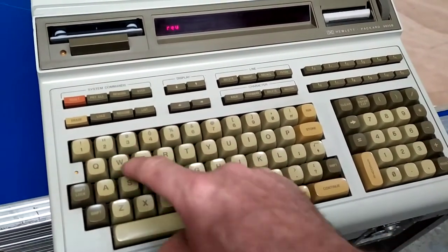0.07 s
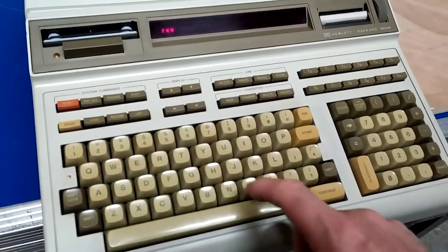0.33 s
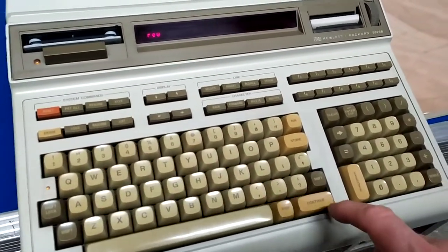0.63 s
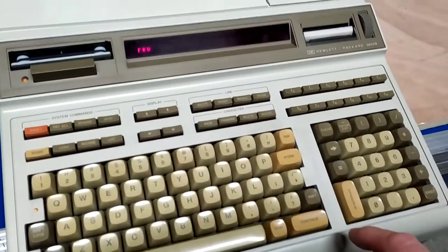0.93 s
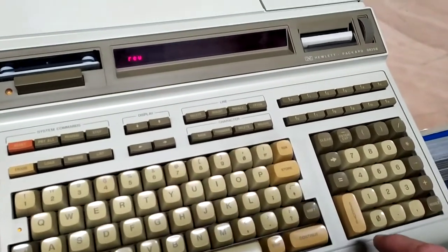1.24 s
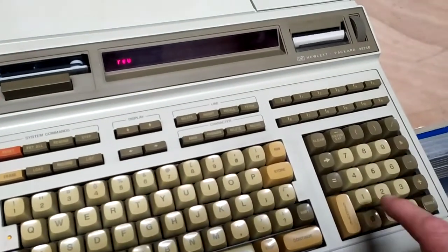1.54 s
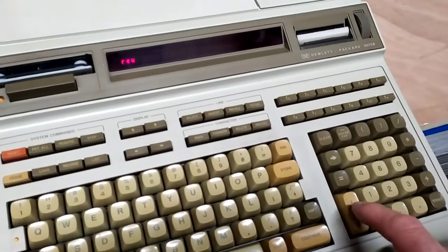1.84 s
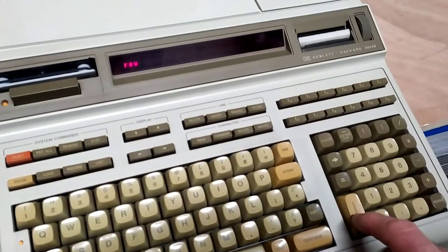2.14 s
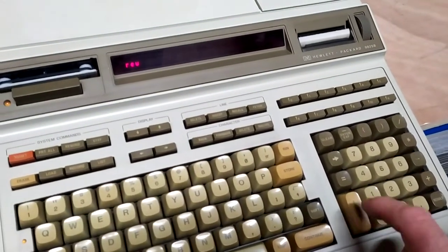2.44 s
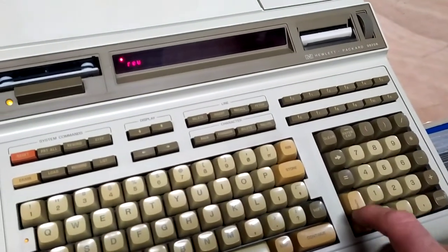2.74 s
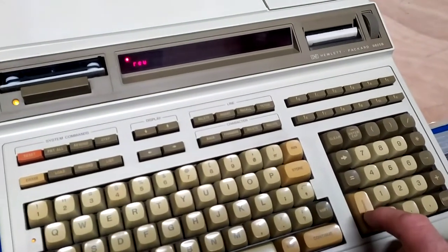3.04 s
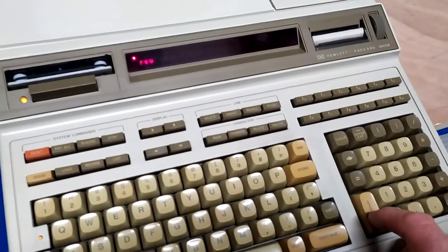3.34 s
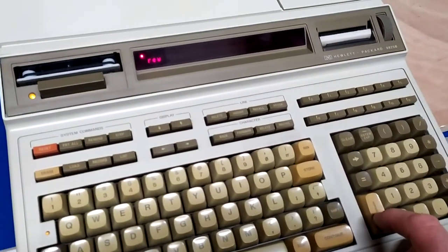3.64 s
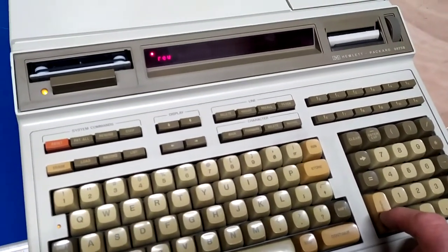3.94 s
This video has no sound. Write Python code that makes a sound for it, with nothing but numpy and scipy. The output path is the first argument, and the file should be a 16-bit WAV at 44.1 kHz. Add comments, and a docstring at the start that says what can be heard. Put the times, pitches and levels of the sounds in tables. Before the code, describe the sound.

A desktop computer's tape drive whines and rattles in three quick runs, set off by a sharp key clack. Before that, its fan hums quietly after a few faint key taps, close by in a small room.

```python
"""A small room, a hand-held microphone close to a desktop computer. Its fan hums, keys are struck,
and the tape cartridge drive shuttles forward, back and forward. The capstan whines on the multiples
of its turning rate, the cartridge buzzes and rattles once a turn, the mechanism clunks at each start,
and loose plastic crackles and ticks, most of all on the backward run."""
import sys
import numpy as np
from scipy import signal
from scipy.fft import rfft, irfft
from scipy.io import wavfile
from scipy.ndimage import uniform_filter1d, map_coordinates

SR = 44100
rng = np.random.default_rng(int(sys.argv[2]) if len(sys.argv) > 2 else 0)


def unload_audio(sound):
    """Save the sound as a 16-bit wav file, at the path given as the first command line argument."""
    columns = np.transpose(np.atleast_2d(sound))
    # keep every value between -1 and 1, then stretch to whole-number steps
    steps = np.round(np.clip(columns, -1, 1) * 32767)
    wavfile.write(sys.argv[1], SR, steps.astype(np.int16))


N = 176400
TIME = np.arange(N) / SR

# stereo likeness of the machine's noises (frequency [Hz], left-right correlation [-1..1])
MACHINE_LIKENESS = [(200, 1), (700, 0.44), (1500, 0.5), (3000, 0.12), (12000, 0)]
# ring of loose plastic (frequency [Hz], relative density [dB])
PLASTIC_SPECTRUM = [(1000, -29), (3000, -10.5), (5200, -4), (6200, -3.5), (8000, -4), (9200, 6),
                    (11000, -4), (13300, -7), (14500, -40), (16000, -21)]


def undb(db):
    """Decibels to gain."""
    return 10 ** (np.asarray(db) / 20)


def unit(x):
    """Scale to rms 1."""
    return x / np.sqrt(np.mean(x ** 2))


def pan(db):
    """Left and right gains for a level difference, left minus right."""
    return undb(np.array([db, -db]).reshape(2, -1) / 2)


def curve(points):
    """A table over frequency, read at every bin."""
    hz, value = np.array(points, float).T
    return np.interp(np.log(np.arange(N // 2 + 1) * SR / N + 1), np.log(hz), value)


def colour(x, spectrum):
    """Causal filter with the given spectrum and unit power gain."""
    cepstrum = irfft(np.log(unit(undb(curve(spectrum)))), N)
    cepstrum[1:N // 2] *= 2
    cepstrum[N // 2 + 1:] = 0
    response = irfft(np.exp(rfft(cepstrum)), N)[:N // 20]
    return signal.fftconvolve(x, response[None], axes=1)[:, :N]


def resonate(x, hz, width_hz):
    """A steep resonance at rms 1."""
    b, a = signal.iirpeak(hz, hz / width_hz, fs=SR)
    return unit(signal.lfilter(b, a, signal.lfilter(b, a, x)))


def noise(likeness=MACHINE_LIKENESS):
    """Stereo white noise with a given correlation in each band."""
    correlation = np.clip(curve(likeness), -.99, .99)
    mid, side = rfft(rng.standard_normal((2, N))) * np.sqrt([1 + correlation, 1 - correlation])
    return unit(irfft([mid + side, mid - side], N))


def walk(per_s):
    """Smooth random drift at rms 1."""
    knots = rng.standard_normal(N // 10)
    drift = np.interp(TIME * per_s, np.arange(len(knots)), knots)
    return unit(uniform_filter1d(drift, int(SR / per_s / 2) + 1))


def ring(at, hz, decay_s):
    """One mode that swells briefly and dies."""
    age = np.maximum(TIME - at, 0)
    return age / decay_s * np.exp(1 - age / decay_s) * np.sin(2 * np.pi * hz * age)


def blows(hits):
    """One impulse for each (time [s], level [dB])."""
    out = np.zeros(N)
    for at, db in hits:
        out[int(at * SR)] += undb(db)
    return out


def struck(hits, spectrum, ring_s, room_s, room_db):
    """The dense ring of a part after each blow, then the room."""
    energy = blows(hits) ** 2 + 1e-18
    fade = lambda s: np.sqrt(signal.lfilter([2 / s / SR], [1, -np.exp(-2 / s / SR)], energy))
    envelope = np.hypot(fade(ring_s), undb(room_db) * fade(room_s))
    return colour(noise() * envelope, spectrum)


def echoes(x, decay_s):
    """Dense reflections that die away, different on each side of the microphone."""
    age = TIME[:N // 10]
    response = rng.standard_normal((2, len(age))) * np.exp(-age / decay_s)
    response /= np.sqrt(np.sum(response ** 2, axis=1, keepdims=True))
    return signal.fftconvolve(np.atleast_2d(x), response, axes=1)[:, :N]


def once_a_turn(turns, width, base, scatter_db, slip=.047):
    """A swell in every turn, each with its own strength and angle; width and slip are in turns."""
    size, shift = rng.standard_normal((N // 500, 2)).T
    turn = turns.astype(int)
    off_peak = turns % 1 - .5 - slip * shift[turn]
    return unit(base + undb(scatter_db * size[turn]) * np.exp(-.5 * (off_peak / width) ** 2))


def fan():
    """Wavering fan and mains tones over a steady rush of air."""
    hum = [(48.4, -74), (183.0, -65.5), (317.6, -59), (629.8, -72), (947.5, -67.5), (1265, -78),
           (1577, -76.5), (1895, -82), (1986, -73.5)]  # fan and mains tones (frequency [Hz], level [dB])
    air_spectrum = [(20, -61), (36, -27), (50, -10), (70, -12.5), (122, -14.5), (178, -9), (253, -16),
                    (313, -6), (469, -17.5), (900, -15), (1140, -18), (1950, -19), (3000, -26.5),
                    (6000, -30), (12000, -33.5), (15000, -31)]  # rush of air (frequency [Hz], relative density [dB])
    air_likeness = [(100, 0.84), (500, 0.77), (1500, 0.69), (5000, 0.068)]  # its stereo likeness (frequency [Hz], correlation [-1..1])
    tones = 0
    for hz, db in hum:
        amplitude = np.sqrt(2) * undb(db + 1.1 * walk(11))
        cycles = np.cumsum(hz * (1 + .00214 * walk(12))) / SR
        tones += amplitude * np.sin(2 * np.pi * cycles)
    air = colour(noise(air_likeness), air_spectrum) * undb(-60.5 + .06 * walk(2.65))
    return undb(.5) * tones * pan(-.5) + air


def keystrokes():
    """A key lands with a short clack; the case answers, the keycap rings and its spring sizzles."""
    strokes = [(.001, -21, -11, 0), (.008, -22, -22, -10), (.076, -38, -27, -6), (2.652, 0, -1.5, -4)]  # key strokes (time [s], clack [dB], case [dB], keycap and spring [dB])
    case_spectrum = [(40, -36), (100, -3), (200, -7), (440, -13.5), (800, -1), (1500, 5.5), (2400, 1.5),
                     (4000, -14), (8000, -17.5), (12000, -20), (15000, -21)]  # ring of the case (frequency [Hz], relative density [dB])
    spring_spectrum = [(1500, -20), (3000, -1), (5500, -2), (7500, -18), (9300, 3), (15000, -31)]  # sizzle of the spring (frequency [Hz], relative density [dB])
    clack_modes = [(1350, .0006, -19.5), (2150, .0006, -18.5)]  # key hitting its stop (frequency [Hz], decay [s], level [dB])
    keycap_modes = [(641, .009, -51), (1550, .005, -52), (2260, .012, -56), (2848, .006, -59)]  # keycap ringing on (frequency [Hz], decay [s], level [dB])
    case_hits = [(at, db) for at, _, db, _ in strokes]
    spring_hits = [(at, db) for at, _, _, db in strokes]
    out = undb(-5.5) * struck(case_hits, case_spectrum, ring_s=.0085, room_s=.023, room_db=0)
    out += undb(-28.5) * struck(spring_hits, spring_spectrum, ring_s=.0099, room_s=.048, room_db=-2)
    for at, clack_db, _, keycap_db in strokes:
        out += sum(undb(clack_db + db) * ring(at, hz, decay_s) for hz, decay_s, db in clack_modes)
        out += sum(undb(keycap_db + db) * ring(at, hz, decay_s) for hz, decay_s, db in keycap_modes)
    return out * pan(-3)


def plastic_ticks():
    """Loose plastic snaps for a few cycles and rings briefly, right of centre."""
    ticks = [(.077, -48), (.097, -44), (3.157, -22), (3.1845, -12), (3.189, -20), (3.2075, -19),
             (3.2215, -16), (3.2538, -13.5), (3.288, -21), (3.334, -15.5), (3.338, -21), (3.346, -20),
             (3.3683, -8), (3.372, -20), (3.448, -19), (3.4826, -8.5), (3.487, -19), (3.517, -19)]  # snaps of the plastic (time [s], level [dB])
    snap_band = signal.butter(4, (8400, 13300), "bandpass", fs=SR, output="sos")
    snap = signal.sosfilt(snap_band, blows(ticks) + 1e-18)
    tail = struck(ticks, PLASTIC_SPECTRUM, ring_s=.0014, room_s=.012, room_db=-2)
    return (undb(13) * snap + undb(5) * tail) * pan(-4)


def chassis_thuds():
    """The chassis thuds as the last key lands and the motor starts."""
    thuds = [(2.655, 101, 0.01, -51.5), (2.73, 313.4, 0.025, -39)]  # chassis modes (time [s], frequency [Hz], decay [s], level [dB])
    return sum(undb(db) * ring(at, hz, decay_s) for at, hz, decay_s, db in thuds)


def capstan_whine(turns, harmonics, waver_db=.47):
    """The capstan sings in wavering lines on the multiples of its turning rate."""
    tones = 0
    for multiple, db in harmonics:
        amplitude = undb(db + waver_db * walk(24.71))
        tones += amplitude * np.sin(2 * np.pi * (multiple * turns + rng.random()))
    return np.array([tones, tones])


def cartridge_rattle(turns, repeat_share=.096, clicks_per_s=700):
    """Scraping that partly repeats with each turn, plus loose clicks, scattered inside the case."""
    spectrum = [(1300, -26), (1900, -1), (2350, 0), (2750, 1), (3300, -1.5), (3700, 6.5), (4500, -1),
                (5300, 3), (6400, 1), (7000, 0.5), (7800, -0.5), (9000, -1), (9900, -4.5), (11300, -3.5),
                (13400, -7), (14500, -31)]  # rattling cartridge (frequency [Hz], relative density [dB])
    track = rng.standard_normal(SR // 87)  # roughness met in one turn
    repeating = unit(np.interp(turns % 1 * len(track), np.arange(len(track)), track))
    scrape = np.sqrt(repeat_share) * repeating + np.sqrt(1 - repeat_share) * rng.standard_normal(N)
    clicks = unit((rng.random(N) < clicks_per_s / SR) * rng.standard_normal(N))
    contact = (scrape + undb(-4.5) * clicks) * once_a_turn(turns, width=.15, base=.62, scatter_db=3)
    return colour(.4 * contact + echoes(contact, decay_s=.008), spectrum)


def rasp(turns):
    """A short gritty scrape once a turn."""
    spectrum = [(2000, -29), (4000, 2), (5200, -3), (6700, -8), (7800, -9), (9000, 6), (10000, -6),
                (11300, 5), (13300, -3), (14300, -12), (16000, -55)]  # bright scrape (frequency [Hz], relative density [dB])
    grit = undb(walk(2800)) * noise()
    return colour(grit * once_a_turn(turns, width=.1, base=.05, scatter_db=2.2, slip=.05), spectrum)


def case_reflections(x, sway_per_s=7):
    """Reflections off the case cut notches in the treble that shift as the hand-held microphone moves."""
    paths = [(.000422, .012, -8.5), (.0013, .04, -11), (.0037, .01, -9)]  # bounces off the case (delay [s], drift [share of delay], level [dB])
    out = x
    for delay_s, drift, db in paths:
        position = (TIME - delay_s * (1 + drift * walk(sway_per_s))) * SR
        out = out + undb(db) * np.array([map_coordinates(side, [position], mode="nearest") for side in x])
    return out


def plastic_crackle(turns, clicks_per_s=130):
    """Small irregular ticks of loose plastic, thickest at one point of the turn."""
    chance, size = rng.random(N), rng.standard_normal(N)
    density = once_a_turn(turns, width=.1, base=.15, scatter_db=3)
    clicks = (chance < clicks_per_s / SR * density / np.mean(density)) * size
    return colour(clicks + echoes(clicks, decay_s=.001), PLASTIC_SPECTRUM)


def drive_rumble(turns):
    """A rough midrange noise whose strength changes from turn to turn."""
    spectrum = [(120, -17), (280, -4.5), (600, 0.5), (1100, 5.5), (1400, -6.5), (2200, 7), (2800, -2.5),
                (4500, -18.5)]  # body of the drive (frequency [Hz], relative density [dB])
    return colour(noise() * once_a_turn(turns, width=1, base=.81, scatter_db=5), spectrum)


def shell_buzz(turns):
    """The cartridge shell rings in a regular burst once a turn."""
    bursts = once_a_turn(turns + .1, width=.14, base=.15, scatter_db=1, slip=.04)
    return resonate(noise() * bursts, hz=1584, width_hz=260)


def tape_drive(spin_up_s=.068, brake_s=.075, flutter=.001):
    """The motor strains as it speeds up and brakes; the drive's other noises follow its speed."""
    # runs of the tape (start [s], standstill [s], rate [turns/s], direction [+1 forward, -1 back],
    # whine [dB], rumble and buzz [dB], rattle and rasp [dB], crackle [dB])
    runs = [(2.699, 3.118, 86.6, 1, 3, 1.5, 0.5, -15), (3.123, 3.612, 87.45, -1, 1, 2, 0, -1),
            (3.614, 4.2, 86.5, 1, 1, -0.5, 0.5, -3.5)]
    forward_lines = [(1, -23.5), (2, -20.5), (3, -5), (4, -17), (5, -10), (6, -8), (7, -17.5), (8, -14.5),
                     (9, -17.5), (10, -7), (11, -5), (12, -4.5), (14, -9), (15, -21), (16, -12), (17, 1.5),
                     (18, 0), (19, -10), (20, 2), (21, -6.5)]  # forward whine (multiple [x turning rate], relative level [dB])
    backward_lines = [(1, -21.5), (2, -17.5), (3, -7.5), (4, -17), (5, -12.5), (6, -7.5), (7, -8.5),
                      (8, -8.5), (9, -20.5), (11, -19), (12, -8), (13, -16), (14, -9.5), (15, -12),
                      (16, -11.5), (17, 3), (18, 1.5), (19, -9), (20, -6.5), (21, -8)]  # backward whine (multiple [x turning rate], relative level [dB])
    balance = [(60, 10), (110, -7), (200, 5), (380, 3), (700, -8), (1290, -2.5), (2380, -3), (4400, 1.5),
               (8120, -1.5), (15000, -10.5)]  # drive at the microphone (frequency [Hz], left minus right [dB])
    speeds = [np.clip(np.minimum((TIME - start) / spin_up_s, (stop - TIME) / brake_s), 0, 1)
              for start, stop, *_ in runs]
    rate = sum(speed * run[2] for speed, run in zip(speeds, runs)) * (1 + flutter * walk(30))
    turns = np.cumsum(rate) / SR
    running = rate > np.max(rate) / 2
    level = lambda x, db: undb(db) * x / np.sqrt(np.mean(x[:, running] ** 2))  # rms while running
    forward = level(capstan_whine(turns, forward_lines), -37.5)
    backward = level(capstan_whine(turns, backward_lines), -35)
    rattle = case_reflections(level(cartridge_rattle(turns), -37) + level(rasp(turns), -42))
    crackle = level(plastic_crackle(turns), -40)
    body = level(drive_rumble(turns), -44) + level(shell_buzz(turns), -40.5)
    strain = undb(-40.5) * resonate(noise(), hz=398, width_hz=570)
    out = np.zeros((2, N))
    for speed, (_, _, _, direction, whine_db, body_db, rattle_db, crackle_db) in zip(speeds, runs):
        ramping = (speed > 0) & (speed < 1)
        torque = uniform_filter1d(ramping.astype(float), N // 100)
        out += speed * torque * strain
        out += speed ** 1.4 * undb(body_db) * body
        out += speed ** 3 * (undb(rattle_db) * rattle + undb(crackle_db) * crackle)
        out += speed ** 7 * undb(whine_db) * (forward if direction > 0 else backward)
    return irfft(rfft(out) * pan(curve(balance)), N)


def slack_clunks():
    """The mechanism clunks as it takes up slack at each start."""
    hits = [(2.702, -25), (2.735, -17.5), (2.753, -12), (3.1175, -20), (3.133, -24), (3.157, -15),
            (3.632, -23.5), (3.651, -15.5)]  # blows in the mechanism (time [s], level [dB])
    spectrum = [(300, -3.5), (1500, 5.5), (3000, -0.5), (5000, 2.5), (7000, 0), (9200, -0.5), (13000, -4),
                (15000, -17)]  # ring of the mechanism (frequency [Hz], relative density [dB])
    return struck(hits, spectrum, ring_s=.002, room_s=.016, room_db=.5)


def scene(left_lag_s=.00014):
    """Fan, keys and drive from close by; the sound reaches the microphone's left side slightly later."""
    clunks = slack_clunks()
    tape = tape_drive()
    machine = fan() + keystrokes() + plastic_ticks() + chassis_thuds() + tape + clunks
    room = undb(-11) * echoes(tape, decay_s=.046)
    left, right = machine + room
    return np.array([np.roll(left, int(left_lag_s * SR)), right])


def record(dry, top_hz=15800):
    """The recorder cuts the top steeply."""
    return signal.sosfilt(signal.ellip(8, .2, 70, top_hz, fs=SR, output="sos"), dry)


dry = scene()
out = record(dry)
unload_audio(out)
```